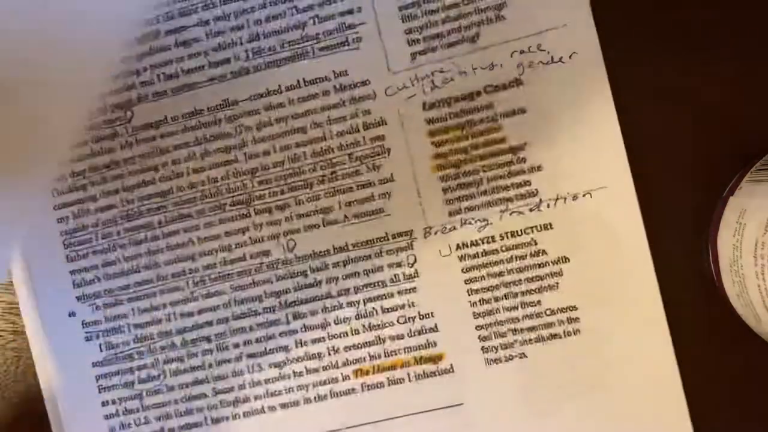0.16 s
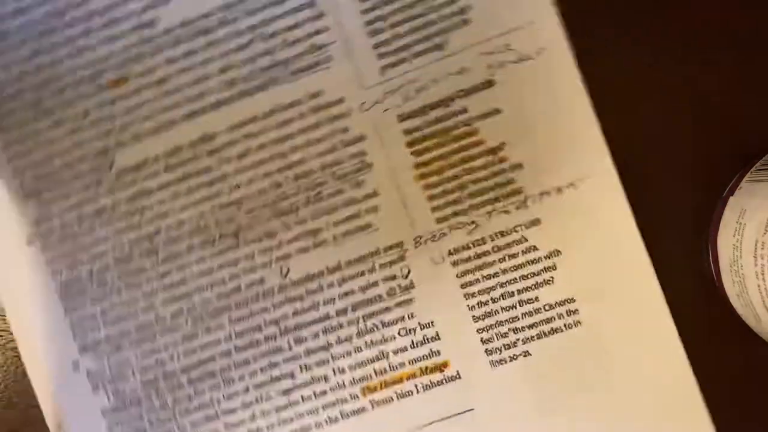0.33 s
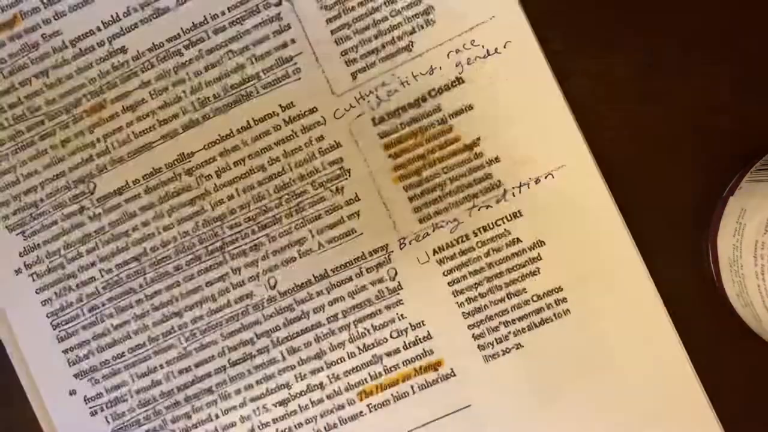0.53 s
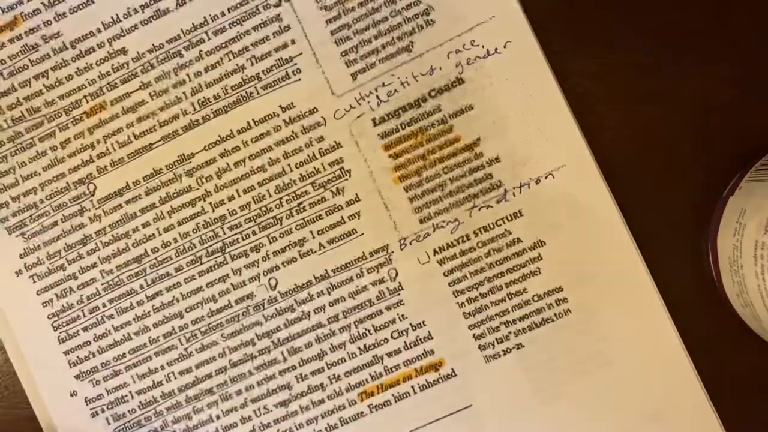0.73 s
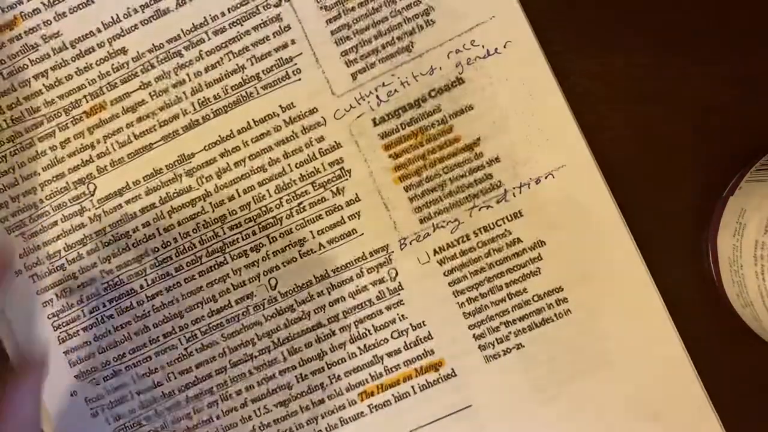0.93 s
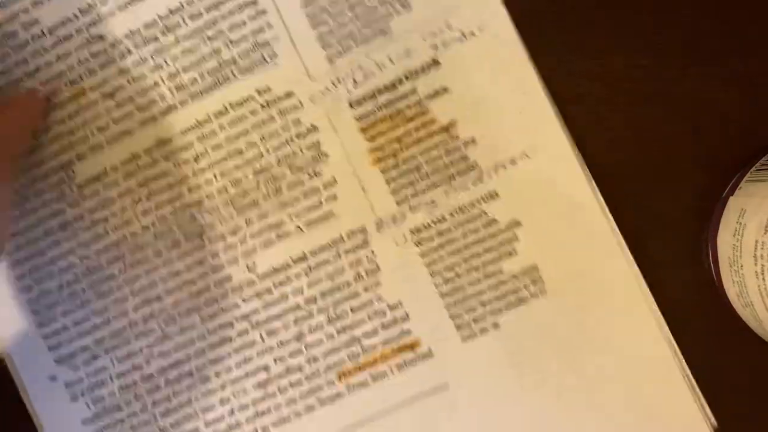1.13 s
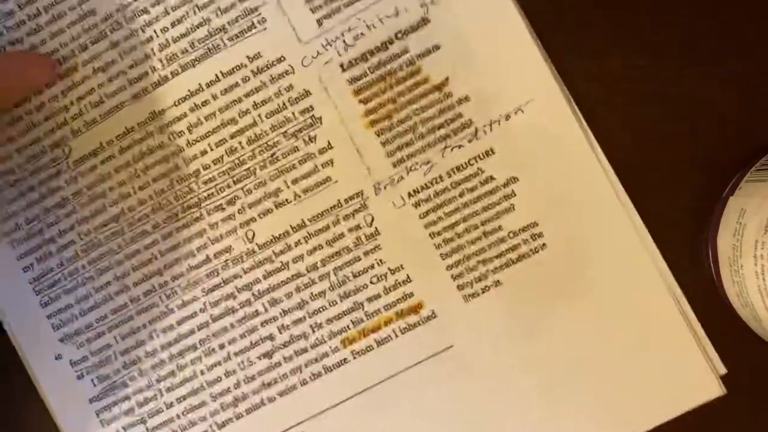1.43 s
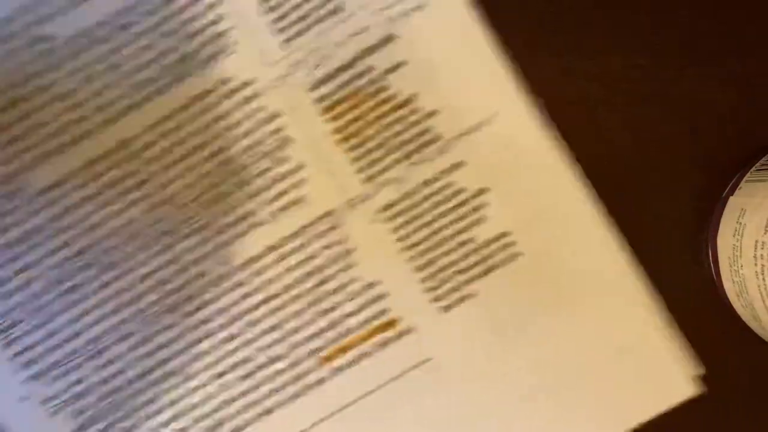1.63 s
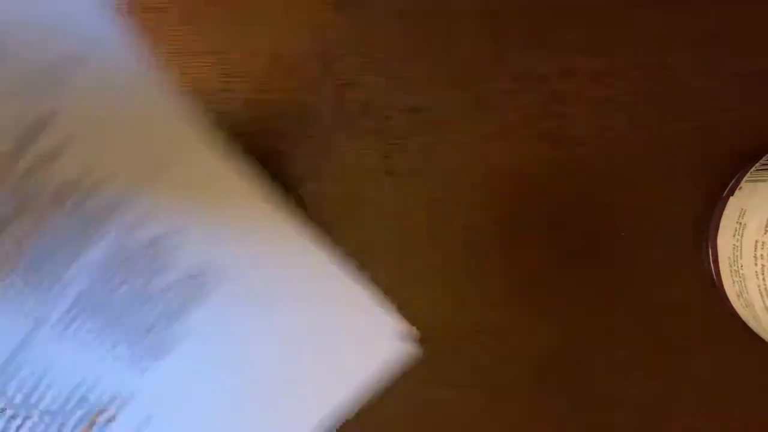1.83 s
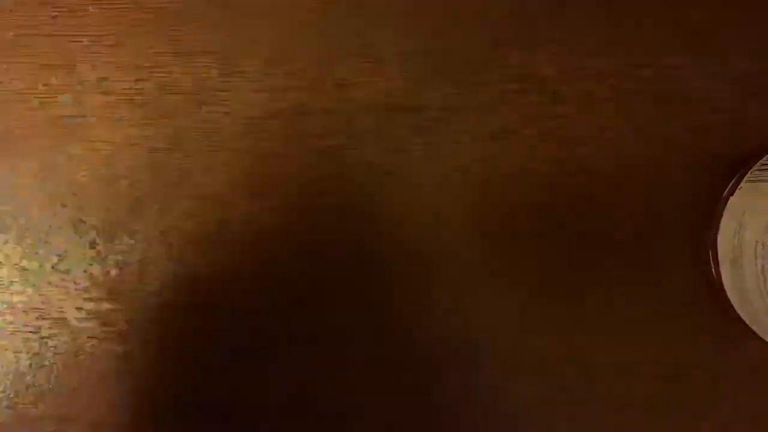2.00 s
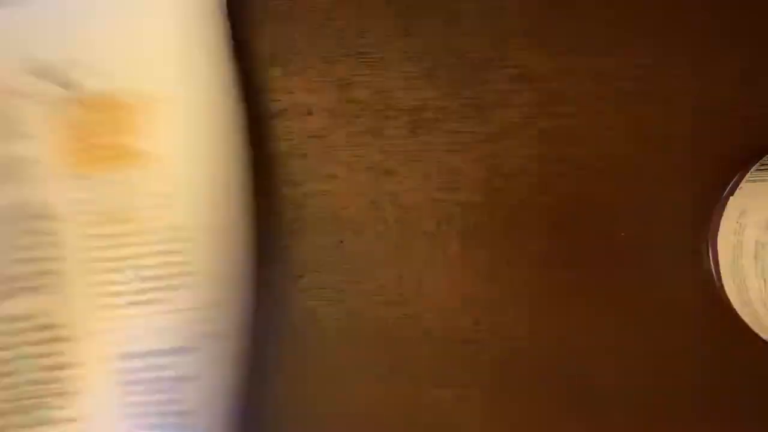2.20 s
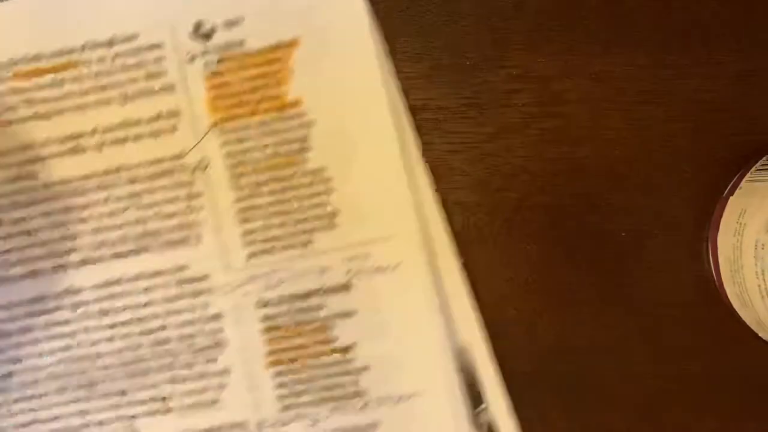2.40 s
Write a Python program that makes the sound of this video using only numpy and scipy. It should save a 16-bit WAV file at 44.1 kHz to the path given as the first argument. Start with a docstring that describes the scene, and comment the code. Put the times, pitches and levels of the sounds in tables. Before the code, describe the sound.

Paper pages are turned close to the microphone in a quiet room. One leaf slaps down, a fingertip rubs over it with a brief squeak, then the next snaps free, slides, crackles and lands with a soft thump.

```python
"""A quiet room, close on a book at a wooden table: pages turn beside a phone's two microphone ports.
A leaf slaps down, a fingertip sticks and slips over it with a squeak, the next leaf snaps free, slides
and buckles, and the pages land with a soft thump that rings the table. The paper is built from tiny
fibre clicks in layers of body, crinkle and hiss; underneath, the moving sheets push air at the ports."""
import sys
import numpy as np
from scipy import signal
from scipy.fft import rfft, irfft, next_fast_len
from scipy.io import wavfile

SR = 44100
rng = np.random.default_rng(int(sys.argv[2]) if len(sys.argv) > 2 else 0)


def to_wav(sig):
    """Store sig (one row per channel, or 1-D mono) as 16-bit WAV at the path in sys.argv[1].

    Samples outside -1..1 are clipped; the rate is SR.
    """
    pcm = np.clip(np.atleast_2d(sig), -1, 1) * 32767
    pcm = np.round(pcm).astype(np.int16)
    wavfile.write(sys.argv[1], SR, pcm.T)  # frames by channels


N = 112454
T = np.arange(N) / SR
SIZE = next_fast_len(2 * N)
FREQ = np.arange(SIZE // 2 + 1) * SR / SIZE

# EQ of the room tone, the reverb and the pushed air (frequency [Hz], gain [dB])
ROOM_TONE_EQ = [(25, -8), (60, 14), (125, -2), (250, -1), (500, -21), (1500, -13), (5000, -26),
                (16000, -23)]
REVERB_EQ = [(60, -8), (250, -1), (700, -5), (1500, -6), (4000, -0.5), (8000, -30.5), (16000, -8)]
AIR_EQ = [(20, -66), (33, -1.5), (52, 4), (78, 5), (100, -3.5), (125, -0.5), (170, -3), (250, -7.5),
          (360, -26.5), (800, -68)]
# fader ride of the pushed air (time [s], level [dB])
AIR_RIDE = [(0, -52.5), (.14, -56.5), (.23, -33), (.285, -32), (.32, -54), (.37, -38.5), (.45, -56.5),
            (.55, -61), (.59, -44.5), (.63, -48.5), (.655, -35), (.72, -49.5), (.88, -59.5), (1.05, -46.5),
            (1.13, -52), (1.23, -42.5), (1.31, -56.5), (1.62, -45.5), (1.95, -50.5), (2.0, -34),
            (2.12, -66.5), (2.17, -32.5), (2.235, -27.5), (2.28, -52), (2.42, -60.5), (2.55, -59.5)]
# soft blows on book and table (time [s], level [dB], push length [ms])
THUMP_CUES = [(0.223, -31.5, 2.5), (.256, -47, 1.8), (.646, -33, 2.9), (1.127, -39, 2.3), (1.999, -35, 5),
              (2.041, -34.5, 4.4), (2.204, -30, 2.6), (2.224, -23, 2.85)]
# modes of the wooden table (frequency [Hz], level [dB], 60 dB decay time [s])
TABLE_MODES = [(79.2, 9, 0.46), (125.1, 6, 0.84), (192, 10, 0.31), (252, 3, 0.13), (358, -3, .25),
               (397, -6, .2)]
# the fingertip's squeak (time [s], pitch [Hz], level [dB])
SQUEAK_PATH = [(.538, 1417, -63), (.542, 1397, -32), (.552, 1372, -49), (.561, 1355, -27.5),
               (.582, 1446, -28), (.60, 1406, -30.5), (.635, 1370, -37), (.72, 1382, -42.5),
               (.88, 1408, -56.5)]
# buckling (peak time [s], body [dB], crinkle [dB], hiss [dB], ring [dB], pitch [Hz], swell and fade [ms])
BUCKLE_CUES = [(.145, -52, -47.5, -57, -43, 3010, 11.7), (0.208, -48, -51, -52, -33, 1620, 8.6),
               (0.574, -34, -45, -34.5, -40, 4000, 9.1), (1.648, -31, -25, -38, -25, 3180, 6),
               (1.687, -35, -25.5, -37, -30, 1780, 3.4), (1.78, -31.5, -35.5, -57, -32.5, 1670, 5.6),
               (1.819, -36, -32, -47, -37.5, 1900, 4.1), (1.928, -36, -33.5, -43, -61, 1220, 11),
               (1.987, -36.5, -38, -54, -37, 1200, 6.4), (2.022, -62, -66, -54, -46, 4250, 16),
               (2.174, -32.5, -31.5, -38, -25.5, 1114, 6.2)]
# sharp snaps (time [s], body [dB], crinkle [dB], hiss [dB], ring [dB], pitch [Hz], decay [ms])
SNAP_CUES = [(0.2221, -14.5, -13.5, -16.5, -30, 1470, 1.97), (0.2761, -25.5, -45, -30, -38, 1600, 8),
             (0.289, -58, -27.5, -35, -23, 3100, 2.5), (0.3348, -29, -30, -49, -40, 2420, 3.6),
             (0.6387, -32, -30.5, -30.5, -21, 644, 4.8), (0.653, -36, -26, -37, -28.5, 2340, 4.1),
             (0.9782, -37, -48, -58, -59, 1840, 2.7), (1.048, -34.5, -43, -46, -32, 640, 3.1),
             (1.077, -24.5, -19, -19, -17.5, 5060, 3.14), (1.0977, -36, -25, -33, -27, 5360, 4.1),
             (1.11, -53, -45, -28.5, -34, 1910, 1.7), (1.1261, -26, -56, -49, -24.5, 612, 3.3),
             (1.1793, -29, -48, -40, -57, 1950, 3.5), (1.7644, -32, -32, -44, -20, 1010, 3),
             (2.1562, -32, -36, -31, -39, 3480, 3.1), (2.1954, -26, -37, -40, -23, 435, 3.1),
             (2.2045, -30, -26, -30.5, -21.5, 3080, 3.6), (2.2372, -21, -32.5, -31.5, -53, 1060, 2.4),
             (2.4835, -59, -44, -43, -47.5, 3450, 3)]
# rustle of the four gestures (time [s], flapping body [dB], crinkle [dB], sliding hiss [dB])
FIRST_LEAF_RIDE = [(0, -64, -54, -47.5), (.05, -59, -55.5, -50), (.08, -62, -66, -61),
                   (.14, -62, -53.5, -45.5), (.175, -48, -59, -52.5), (.215, -40, -39, -47),
                   (.24, -35.5, -34, -40), (.27, -30.5, -32.5, -51.5), (.33, -40.5, -42, -43),
                   (.39, -41, -49.5, -54), (.42, -48.5, -51.5, -53.5), (.46, -53.5, -55.5, -50.5),
                   (.535, -52, -57.5, -51)]
SMOOTHING_RIDE = [(0.547, -65, -46, -42), (0.573, -50, -34, -39.5), (.61, -36.5, -39.5, -57),
                  (0.634, -49, -45, -51), (0.659, -33, -34.5, -47.5), (.72, -46.5, -49, -54.5),
                  (.79, -48.5, -55, -51.5), (0.878, -58.5, -59, -62.5)]
NEXT_LEAF_RIDE = [(.95, -46.5, -58, -58.5), (1.03, -50, -63, -49), (1.07, -43, -49.5, -52.5),
                  (1.103, -36, -33, -42), (1.161, -49, -48, -50.5), (1.221, -34, -38.5, -37.5),
                  (1.258, -44, -48.5, -47.5), (1.36, -47.5, -48, -47), (1.386, -43, -42.5, -39),
                  (1.43, -44, -42, -42), (1.487, -46, -46, -36), (1.54, -41, -43, -49),
                  (1.62, -35.5, -44, -45.5), (1.672, -40.5, -32, -46), (1.72, -44.5, -44, -47),
                  (1.80, -56, -42.5, -44.5), (1.85, -44, -47.5, -50), (1.899, -42.5, -44, -45.5),
                  (1.96, -59, -53, -53), (2.001, -39.5, -44.5, -54.5), (2.05, -55, -57, -53),
                  (2.095, -67, -57.5, -48.5), (2.125, -73, -66, -61)]
LANDING_RIDE = [(2.152, -73, -63, -60), (2.17, -50, -48, -56), (2.214, -58, -36, -49),
                (2.26, -74, -55, -66), (2.29, -75, -58, -56), (2.35, -73, -68.5, -70),
                (2.40, -95, -73, -62), (2.55, -84, -63, -61.5)]
# top-end sheen (time [s], level against the hiss ride [dB])
SHEEN_RIDE = [(0, -4.5), (.8, -4), (1.05, -0.5), (1.38, -4), (1.49, 3), (1.58, 1), (2.05, -5.5), (2.3, 7.5)]
# EQ of the paper layers (frequency [Hz], gain [dB])
BODY_EQ = [(100, -27), (200, 0), (255, 0.5), (310, -3), (380, -3.5), (480, -3.5), (630, 7.5), (800, 0.5),
           (1000, -3), (1300, -13), (2500, -50.5)]
CRINKLE_EQ = [(400, -65), (800, -6.5), (1100, 3.5), (1400, 1.5), (1800, 1.5), (2400, 1), (3100, -5.5),
              (3700, -10), (6000, -56.5)]
SLIDE_HISS_EQ = [(1800, -22), (2900, 0), (3700, 0), (4700, 4.5), (5600, -2.5), (6400, -3.5), (8000, -5.5),
                 (12000, -61)]
BURST_HISS_EQ = [(1800, -81), (3000, -30.5), (3900, 5.5), (5200, 4), (6400, -6.5), (7600, -5.5),
                 (9000, -3.5), (12000, -12.5), (16000, -13.5)]
SHEEN_EQ = [(4500, -39), (6300, -7.5), (7200, 0), (8500, 0), (12000, 4), (14000, 0), (16000, 2)]
# how alike the paper sounds at the two ports (frequency [Hz], coherence [0-1])
PORT_COHERENCE = [(250, .98), (450, .8), (800, .5), (1600, .3), (2500, .45), (3000, .75), (6000, .8),
                  (6800, .997)]
# right port against the left (frequency [Hz], gain [dB])
RIGHT_EQ = [(60, -.4), (430, -1.5), (600, -11), (720, -9), (1000, -2), (1450, -2), (1750, -5), (2450, -6),
            (2900, -2), (3900, -3), (4500, -7), (5300, -1.5), (6600, 0)]
# phase of the right channel against the left (frequency [Hz], phase lag [rad])
RIGHT_LAG = [(0, 0), (300, .35), (420, .7), (520, 2.1), (800, 1.9), (1000, 3.1), (1450, 2.4), (1800, .5),
             (4400, .3), (4700, -.7), (5500, 0), (7500, 0), (8500, -2.9), (9550, -3.4), (10400, -6.2),
             (11600, -6.3), (12700, -9.3), (13700, -9.5), (14500, -12.5), (16700, -12.5)]


def undb(db):
    """Decibels to gain."""
    return 10 ** (np.asarray(db) / 20)


def unit(x):
    """Scale to rms 1."""
    return x / np.sqrt(np.mean(x ** 2))


def curve(rows, column=1):
    """One column of a table, joined by straight lines in time."""
    rows = np.array(rows)
    return np.interp(T, rows[:, 0], rows[:, column])


def response(eq):
    """Causal frequency response through the points of an EQ."""
    hz, db = np.array(eq).T
    gain = undb(np.interp(np.log(FREQ + 1), np.log(hz), db))
    cepstrum = irfft(np.log(gain), SIZE)
    cepstrum[1:SIZE // 2] *= 2  # fold to minimum phase
    cepstrum[SIZE // 2 + 1:] = 0
    return np.exp(rfft(cepstrum))


def through(x, h):
    """Filter by a frequency response."""
    return irfft(rfft(x, SIZE) * h, SIZE)[..., :N]


def colour(x, eq):
    """EQ a white sound and keep its power."""
    h = response(eq)
    return through(x, h / np.sqrt(np.mean(abs(h) ** 2)))


def wander(rate_hz):
    """Smooth random modulation, spread near 1."""
    return 1.2 * np.interp(T * rate_hz, np.arange(4096), rng.standard_normal(4096))


def room_tone(level_db=-71.5):
    """The bed: a steady, bass-heavy hush."""
    return undb(level_db) * colour(rng.standard_normal(N), ROOM_TONE_EQ)


def add_reverb(x, early_db=-8, early_ms=8, tail_db=-16.5, t60_s=.54):
    """Quick reflections off the table top and a short room tail, different at each port."""
    early, tail = rng.standard_normal((2, 2, N)) * (T > .001)
    early = unit(early * np.exp(-T * 1000 / early_ms))
    tail = unit(tail * np.exp(-np.log(1000) * T / t60_s))
    echo = (undb(early_db) * early + undb(tail_db) * tail) / np.sqrt(N)
    return x + through(x, rfft(echo, SIZE) * response(REVERB_EQ))


def pushed_air():
    """Low flutter of air under the moving sheets."""
    return colour(rng.standard_normal(N), AIR_EQ) * undb(curve(AIR_RIDE))


def thumps(puff_db=5, ring_db=-16.5):
    """The weight: each blow squeezes out a puff of air and rings the table."""
    push, puff = np.zeros(N), np.zeros(N)
    for at, db, length_ms in THUMP_CUES:
        from_peak = (T - at) * 1000 / length_ms - 1
        bump = np.exp(-2 * from_peak ** 2)
        push += undb(db) * bump / bump.sum()
        puff += undb(db + puff_db) * -2 * from_peak * np.exp(-from_peak ** 2)
    wood = sum(undb(db) * np.sin(2 * np.pi * hz * T) * np.exp(-np.log(1000) * T / t60)
               for hz, db, t60 in TABLE_MODES)
    return puff + undb(ring_db) * through(push, rfft(wood, SIZE))


def finger_squeak(width_hz=130):
    """A fingertip sticks and slips on the page: a rough, narrow tone."""
    phase = 2 * np.pi * np.cumsum(curve(SQUEAK_PATH)) / SR
    rough = wander(2 * width_hz) * np.sin(phase) + wander(2 * width_hz) * np.cos(phase)
    gate = (T > SQUEAK_PATH[0][0]) * (T < SQUEAK_PATH[-1][0])
    return rough * undb(curve(SQUEAK_PATH, column=2)) * gate


def fibre_clicks(per_s, spread_db):
    """The grain of the paper: tiny clicks of uneven size; rms 1."""
    size = undb(spread_db * np.minimum(rng.exponential(size=N), 5))
    fires = rng.random(N) < per_s / SR
    return unit(fires * size * np.sign(rng.standard_normal(N)))


def sheet_ring(x, hz, q=5.1):
    """The taut part of a sheet rings around one pitch; white sound keeps its power."""
    b, a = signal.iirpeak(hz, q, fs=SR)
    makeup = np.sqrt(2 * SR * q / (np.pi * hz))
    return signal.lfilter(b, a, signal.lfilter(b, a, x + 1e-18)) * makeup


def sheet(bursts):
    """Voice bursts (clicks, four levels [dB], pitch [Hz]) as body, crinkle, hiss and the sheet's ring."""
    layers = 0
    for k, eq in enumerate([BODY_EQ, CRINKLE_EQ, BURST_HISS_EQ]):
        send = sum(undb(levels[k]) * clicks for clicks, levels, _ in bursts)
        layers += colour(send, eq)
    return layers + sum(undb(levels[-1]) * sheet_ring(clicks, hz) for clicks, levels, hz in bursts)


def buckles():
    """The lifted leaf bends in short avalanches of clicks that swell and fade."""
    fibres, bursts = fibre_clicks(per_s=6000, spread_db=-1.5), []
    for at, *levels, hz, fade_ms in BUCKLE_CUES:
        from_peak_ms = np.minimum(abs(T - at), .4) * 1000
        bursts.append((fibres * np.exp(-from_peak_ms / fade_ms), levels, hz))
    return sheet(bursts)


def snaps(attack_ms=.2, shiver_db=-19, shiver_ms=16):
    """A crease pops through: one pop, a crack of a few milliseconds, then the sheet shivers."""
    fibres, bursts = fibre_clicks(per_s=12000, spread_db=1.5), []
    for at, *levels, hz, decay_ms in SNAP_CUES:
        age_ms = np.clip(T - at, 0, .4) * 1000
        attack = 1 - np.exp(-age_ms / attack_ms)
        crack = np.exp(-age_ms / decay_ms)
        shiver = undb(shiver_db) * np.exp(-age_ms / shiver_ms)
        clicks = fibres * attack * (crack + shiver)
        clicks[int((at + .0007) * SR)] += 6 * undb(-9.5)  # the pop
        bursts.append((clicks, levels, hz))
    return sheet(bursts)


def rustle():
    """Sheets flap, crinkle and slide: streams of clicks that catch and slip, with a sheen on top."""
    ride = FIRST_LEAF_RIDE + SMOOTHING_RIDE + NEXT_LEAF_RIDE + LANDING_RIDE
    body_db, crinkle_db, hiss_db = (curve(ride, column) for column in (1, 2, 3))
    catch = wander(rate_hz=90)
    body = fibre_clicks(per_s=1200, spread_db=3) * undb(body_db + 2 * catch)
    crinkle = fibre_clicks(per_s=2500, spread_db=2) * undb(crinkle_db + 3 * catch)
    hiss = fibre_clicks(per_s=14000, spread_db=3) * undb(hiss_db + 2 * catch)
    sheen = fibre_clicks(per_s=9000, spread_db=2.2) * undb(hiss_db + curve(SHEEN_RIDE))
    return (colour(body, BODY_EQ) + colour(crinkle, CRINKLE_EQ)
            + colour(hiss, SLIDE_HISS_EQ) + colour(sheen, SHEEN_EQ))


def scene():
    """Paper, finger and table over room tone; each port hears a partly different patch of the sheet."""
    left, other_patch = (rustle() + snaps() + buckles() + finger_squeak() for _ in range(2))
    alike = np.interp(FREQ, *np.array(PORT_COHERENCE).T)
    right = through(left, alike) + through(other_patch, np.sqrt(1 - alike ** 2))
    foley = np.array([left, right]) + thumps() + pushed_air()
    return add_reverb(foley) + room_tone()


def record(dry):
    """The right channel has its own colour and phase; the deep bass and the very top are cut on both."""
    low_cut_hz, high_cut_hz = 38.3, 15800
    lag = np.interp(FREQ, *np.array(RIGHT_LAG).T)
    right = through(dry[1], abs(response(RIGHT_EQ)) * np.exp(-1j * lag))
    low_cut = 1 - 1 / (1 + (FREQ / low_cut_hz) ** 4)
    high_cut = signal.ellip(10, .2, 80, high_cut_hz, fs=SR, output="sos")
    return signal.sosfilt(high_cut, through(np.array([dry[0], right]), low_cut))


dry = scene()
out = record(dry)
to_wav(out)
```